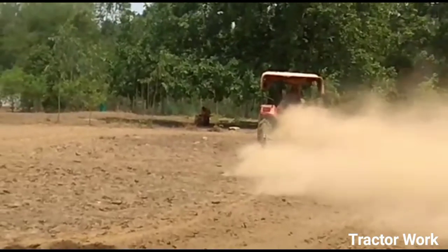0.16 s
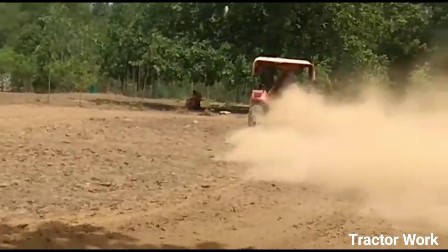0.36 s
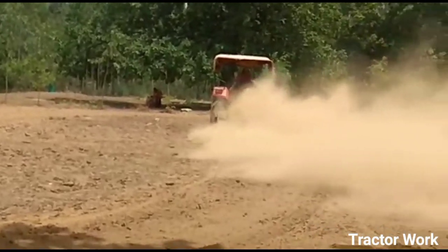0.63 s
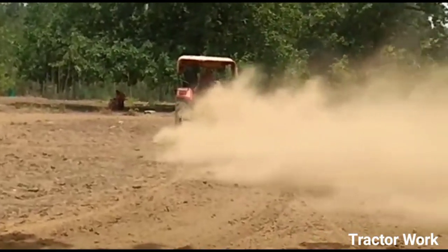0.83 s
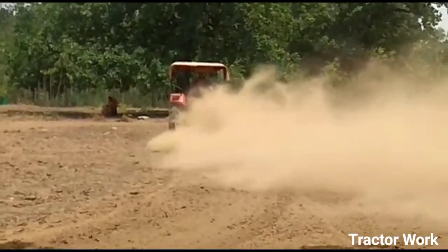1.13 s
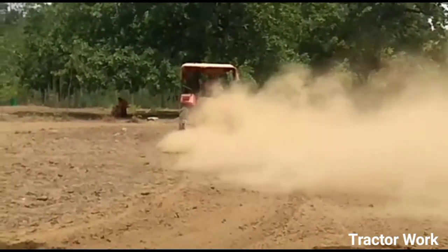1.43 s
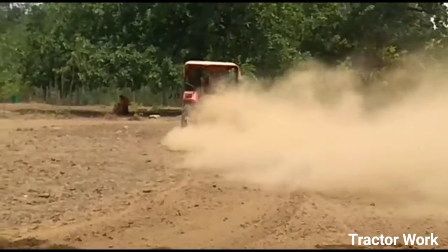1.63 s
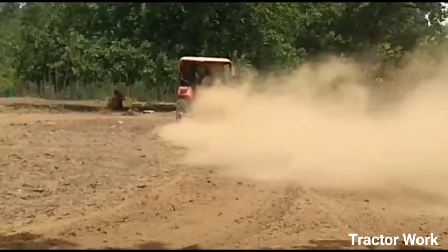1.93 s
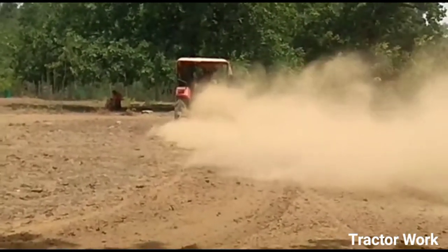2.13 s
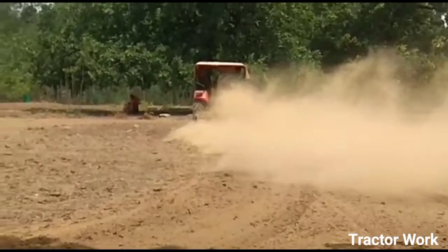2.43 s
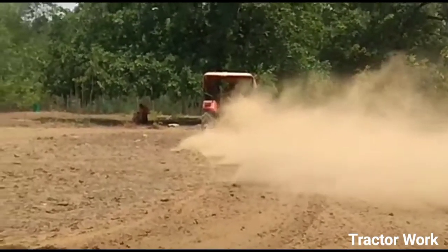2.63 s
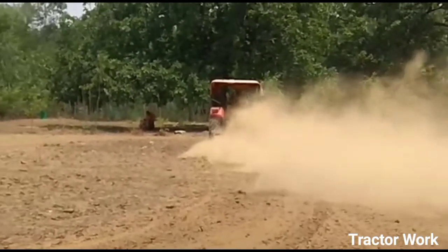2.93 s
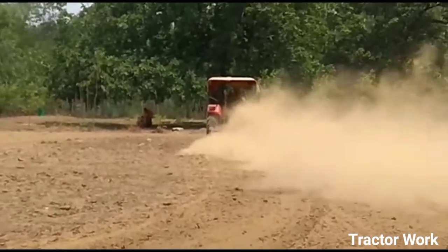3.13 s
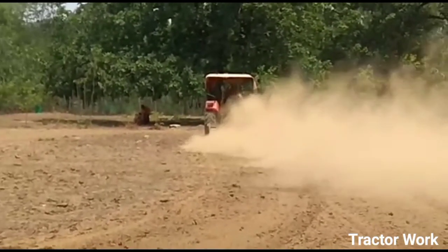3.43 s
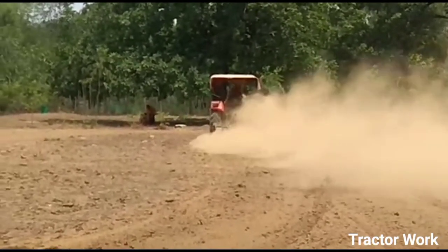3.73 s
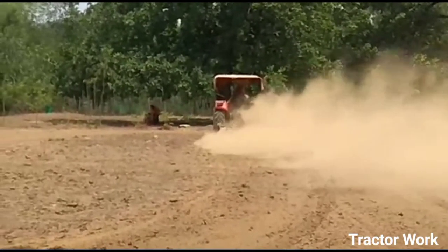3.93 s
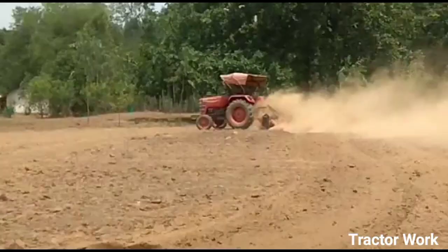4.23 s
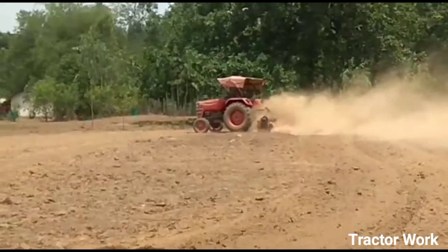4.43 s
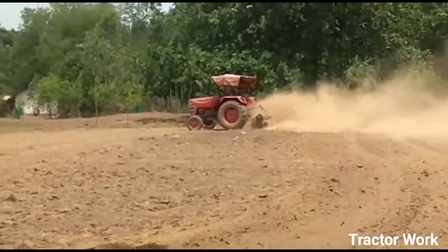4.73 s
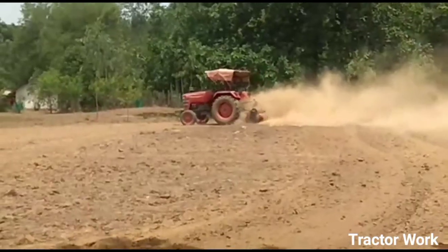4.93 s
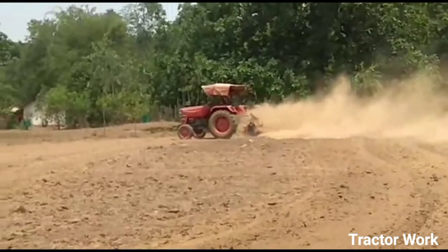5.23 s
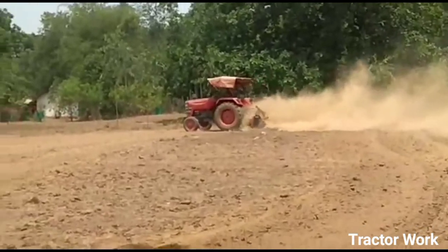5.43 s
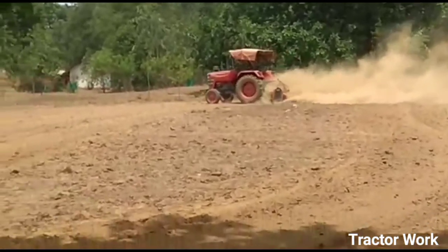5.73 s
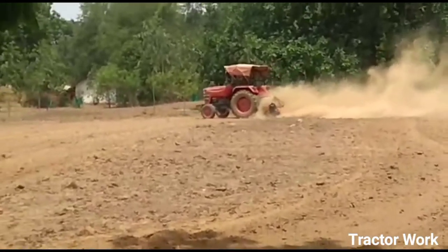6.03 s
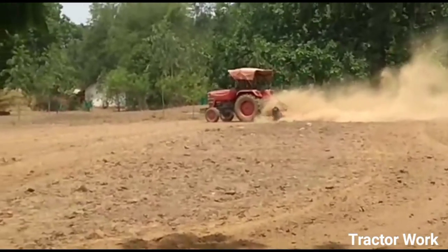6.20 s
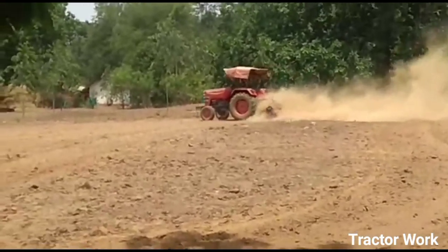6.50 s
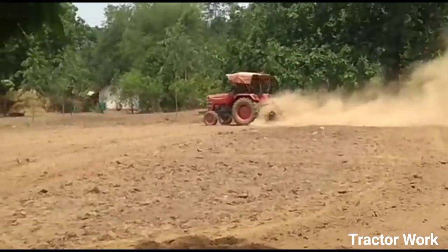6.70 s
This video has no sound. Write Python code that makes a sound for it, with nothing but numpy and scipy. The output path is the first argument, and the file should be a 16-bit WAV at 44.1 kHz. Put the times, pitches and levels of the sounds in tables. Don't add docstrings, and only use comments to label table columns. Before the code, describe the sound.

Throbbing tractor engine and gritty tiller blades work a dry field, loud and gusty at first, then abruptly thinner and fading after a cut.

```python
import sys
import numpy as np
from scipy import signal
from scipy.fft import rfft, irfft
from scipy.io import wavfile
from scipy.ndimage import uniform_filter1d

SR = 44100
rng = np.random.default_rng(int(sys.argv[2]) if len(sys.argv) > 2 else 0)


def boost(x):
    u = np.asarray(x, float) / 20
    return 10 ** u


def store_pcm(level_fs):
    pcm = np.round(np.clip(level_fs, -1, 1) * 32767).astype(np.int16)
    wavfile.write(sys.argv[1], SR, np.atleast_2d(pcm).T)


N = 302526
CUT_S = 4.16


def rms_one(x):
    return x / np.sqrt(np.mean(x ** 2) + 1e-20)


def in_time(rows):
    s, *columns = np.transpose(rows)
    return [np.interp(np.arange(N) / SR, s, column) for column in columns]


def panned(left_minus_right_db):
    left = boost(left_minus_right_db)
    return 2 * np.array([left, np.ones_like(left)]) / (1 + left)


def either_view(behind, side):
    return np.where(np.arange(N) < CUT_S * SR, behind, side)


def drift(rate_hz):
    r = np.exp(-80 * np.pi * rate_hz / SR)
    slow = signal.lfilter([1], [1, -2 * r, r * r], rng.standard_normal(N // 40 + 2002))[2000:]
    return np.interp(np.arange(N) / 40, np.arange(len(slow)), rms_one(slow))


def coloured(spectrum, channels, gate=1):
    hz, db = np.transpose(spectrum)
    shape = boost(np.interp(np.log(np.fft.rfftfreq(N, 1 / SR) + 1), np.log(hz), db))
    noise = gate * rng.standard_normal((channels, N))
    return rms_one(irfft(rfft(noise) * shape, N))


def pair(alike):
    shared, own_left, own_right = rng.standard_normal((3, N))
    return np.sqrt(alike) * shared + np.sqrt(1 - alike) * np.array([own_left, own_right])


def resonant(x, modes, patchy_db):
    out = 0
    for k, (hz, width_hz, db, pan_db) in enumerate(modes):
        r = np.exp(-np.pi * 1.55 * width_hz / SR)
        section = [(1 - r * r) / 2, 0, (r * r - 1) / 2, 1, -2 * r * np.cos(2 * np.pi * hz / SR), r * r]
        gain = panned(pan_db)[:, None] * boost(db + patchy_db * drift(8.0)[:x.shape[1]])
        out = out + (-1) ** k * gain * signal.sosfilt([section, section], x)
    return out


def body(drive, views, patchy_db):
    cut = round(CUT_S * SR)
    heard = []
    for part, modes in zip((drive[:, :cut], drive[:, cut:]), views):
        ringing = resonant(part, modes, patchy_db)
        heard.append(ringing / np.std(ringing.mean(axis=0)))
    return np.hstack(heard)


def firing_gate(turns, depth, sharpness, uneven_db):
    count = turns.astype(int)
    cylinder_db = np.array([0., -1.5, -3.])[count % 3]
    strength = boost(cylinder_db + uneven_db * rng.standard_normal(count.max() + 1)[count])
    return 1 - depth + depth * strength * np.exp(-sharpness * (turns % 1))


def struck(noise, gate, turns, knock_db):
    return gate * (noise + boost(knock_db) * np.diff(np.floor(turns), prepend=0))


def grit(per_s, size_db):
    sizes = boost(size_db * np.minimum(rng.exponential(1, N), 4))
    hits = (rng.random(N) < per_s / SR) * sizes
    r = np.exp(-1 / (0.0027 * SR))
    return 1 + .5 * signal.lfilter([1], [1, -r], hits)


# t/s, half length/s, surge level/dB, colour (-1 shakes pipe and frame, 1 sprays soil)
BITES = [(.12, 0.42, 4.7, 0.062), (.46, 0.13, 4.1, -0.74), (0.571, 0.11, 8.8, 0.76),
         (1.04, 0.29, 3.2, -0.2), (1.25, 0.24, 3.9, -0.59), (1.458, 0.15, 2.8, -0.43),
         (1.7, 0.21, 5.1, -0.064), (1.92, 0.17, 5.7, -0.21), (2.1, 0.18, 3.5, -0.076),
         (2.3, .08, 4.2, -0.87), (2.618, 0.18, 7.4, -0.16), (2.763, 0.15, 4.4, 0.78),
         (3.12, 0.14, 7, -0.75), (3.202, 0.16, 8.5, 0.31), (3.54, 0.086, 3, 0.3), (3.66, .15, 7.5, -0.031),
         (3.85, 0.12, 2.2, 0.21), (4.169, 0.041, 4.2, 0.17), (4.324, 0.2, 13.2, -0.047),
         (4.849, 0.29, 8.2, 0.15), (5.004, 0.16, 4.9, -0.83), (5.47, 0.18, 6.8, -0.13),
         (5.62, 0.15, 4.2, 0.84), (5.76, 0.14, 5, 1), (6.0, 0.22, 5.7, -0.25), (6.3, 0.28, 4.2, -0.077),
         (5.36, 0.052, 3.1, 0.39), (6.62, .3, -2.5, 1), (.72, .1, 3.5, -0.63), (4.05, 0.075, 6, -0.66),
         (3.35, .08, 3.8, -1.3), (5.85, 0.18, 2.5, 0.88)]
PARTS = {"pipe": (-46, -3.0, -60, -7, 0.94, -0.82), "frame": (-59, -1.41, -59, -2.5, 1.07, -0.5),
         "blades": (-54.5, -0.46, -57, 0.15, 0.7762, 0.44), "soil": (-53, -2.3, -60.5, -3.5, 0.88, 0.94)}


def part_db(name):
    rear_db, rear_fade, side_db, side_fade, share, lean = PARTS[name]
    t = np.arange(0, N + 64, 64) / SR
    s, half, surge_db, colour = np.transpose(BITES)[:, :, None]
    swell = np.maximum(1 - abs(t - s) / half, 0)
    surge = (surge_db * (1 + lean * colour) * swell).sum(axis=0)
    now = np.arange(N) / SR
    steady_db = either_view(rear_db + rear_fade * now, side_db + side_fade * (now - CUT_S))
    return steady_db + share * np.interp(now, t, surge)


# f/firing rate, rear level/dB, side level/dB
HARMONICS = [(0.752, -25.5, -28.5), (1.998, -11, -17), (4, -7.5, -7), (3, 1.5, -2.5), (5, -1, 8),
             (6.001, -6.5, -2), (7, -23.5, -6), (3.667, -21, -12.5), (1.667, -27.5, -23.5)]
# f/Hz, level/dB per Hz
RUMBLE = [
    [(20, -40), (40, -28), (65, -14), (100, -1), (160, 10), (210, 2), (280, -12), (400, -24), (700, -39.5)],
    [(20, -36), (40, -33), (65, -11), (100, -11.5), (165, 4.5), (200, -8.5), (250, -20.5), (400, -24),
     (700, -37.5)],
]
# t/s, level/dB, relative level/dB of harmonics above the fourth (fade with distance)
DRONE = [
    [(0, -36, 1), (.75, -36.5, 0), (1.25, -38, -3.5), (1.75, -36.5, -3), (2.25, -38, -8.5), (2.75, -39, -7),
     (3.2, -38.5, -5.5), (3.6, -41, -12), (4.15, -39.5, -18)],
    [(4.17, -44, -25), (4.4, -37.5, -25.5), (4.75, -42, -26), (5.25, -39, -29), (5.75, -39, -32),
     (6.24, -38, -27.5), (6.31, -42, -23), (6.39, -39, -25), (6.86, -38.5, -27.5)],
]


def drone(turns):
    drone_db, upper_db = in_time(sum(DRONE, []))
    turns = turns + .015 * drift(4.8)
    tones = 0
    for k, behind_db, side_db in HARMONICS:
        flicker_db = either_view(2.43, .7 + 2.2 * (k % 2 != 1)) * drift(7.2)
        level_db = either_view(behind_db, side_db) + (k > 4.5) * upper_db + flicker_db
        tones = tones + boost(level_db) * np.cos(2 * np.pi * k * turns + 0.34 * (k - 3) ** 2)
    throb = firing_gate(turns, 0.83, 4.1, 0.91)
    mid, side = either_view(*[coloured(view, channels=2, gate=throb) for view in RUMBLE])
    rumble = boost(either_view(-3, -10)) * (mid + 0.48 * side * [[1], [-1]])
    tones = panned(either_view(-5.5, -6.0)) * 1.06 * tones
    rumble = panned(either_view(-1.5, -4.5)) * rumble
    return boost(drone_db) * (tones + rumble)


# f/Hz, width/Hz, level/dB, left minus right/dB
PIPE = [
    [(809, 64.4, 0, -8.5)],
    [(850, 76, 20, -15.5), (920, 86, -13, 7)],
]


def pipe(turns):
    gate = firing_gate(turns, .55, 4, 2.5)
    return boost(part_db("pipe")) * body(struck(pair(.98), gate, turns, knock_db=24), PIPE, patchy_db=2)


# f/Hz, width/Hz, level/dB, left minus right/dB
FRAME = [
    [(956, 54, 3, -6), (1015, 58, -2, -7), (1207, 42, -3.5, -6), (1300, 61, -1.5, -12), (1400, 56, -5, -11),
     (1510, 63, 0.5, -6), (1645, 99, -4, -8), (2114, 145, -7, 2.5), (2571, 40, -8, 3)],
    [(1341, 40, -9.5, -9), (1470, 50, -8, -8), (1612, 74, -1, -21), (2253, 240, -14.5, -4),
     (2322, 55, 1.5, -14), (2796, 67, -6.5, -5.5)],
]


def frame(turns, grains):
    gate = firing_gate(turns, .5, 2.5, 4) * grains ** .7
    shaken = body(struck(pair(.45), gate, turns, knock_db=10), FRAME, patchy_db=4.2)
    return boost(part_db("frame") + 2.5) * shaken


# f/Hz, width/Hz, level/dB, left minus right/dB
BLADES = [
    [(3100, 214, -10, -5), (3764, 77, -1, -16), (3858, 447, -6.5, -4), (4940, 120, -45, -25),
     (7585, 153, -15.5, -12)],
    [(3250, 220, -12.5, -4.5), (3730, 51, -7, -2), (3954, 500, -4, -7.5), (4101, 312, 0.5, 2.5),
     (4810, 200, -11, -1.5), (5200, 350, -19, -4), (5573, 140, -10, -10), (6550, 600, -17, -4),
     (7550, 300, -5, -14)],
]


def blades(turns, grains):
    drive = pair(.8) * firing_gate(turns, .45, 3, 2.5) * grains
    return boost(part_db("blades") + 3.5) * body(drive, BLADES, patchy_db=2.3)


# f/Hz, width/Hz, level/dB, left minus right/dB
SOIL = [
    [(6270, 1700, -6, 3), (7690, 670, 0, -7.5), (9220, 1350, -1.5, 8), (11460, 1100, -3, 7.5),
     (13430, 1550, 0, -0.5)],
    [(6290, 1200, 1.5, 2), (8400, 330, 1.5, -10.5), (9400, 1400, -1.5, 27), (11320, 600, -3.5, 6),
     (12600, 1500, -6.5, -1), (14200, 370, -16, 11)],
]


def soil(turns, grains):
    drive = pair(0.15) * firing_gate(turns, 0.52, 7.0, 3.7) * grains ** 0.36
    return boost(part_db("soil")) * body(drive, SOIL, patchy_db=3.0)


# f/Hz, width/Hz, level/dB, left minus right/dB
CRACK_BODY = [(1564, 290, -18, -1.5), (2137, 163, -15, -1), (2528, 130, -10.5, 6), (3096, 240, -2.5, 1),
              (3810, 153, 3, -2.5), (4260, 310, -8, 1), (4790, 430, -11.5, 1.5), (5700, 410, -21, 0),
              (1400, 78, -24, 0)]


def clatter():
    clods = rms_one(resonant(pair(.7) * grit(per_s=250., size_db=3.5), CRACK_BODY, patchy_db=3))
    blade_db = part_db("blades")
    return boost(blade_db + .8 * (blade_db + 42.5)) * clods


# t/s, firing rate/Hz
FIRING = [(0, 43.9), (.4, 44.1), (.7, 43.7), (1.7, 43.8), (2.1, 44.4), (3.4, 44.5), (4.0, 44.4),
          (4.17, 43.8), (4.6, 44.2), (6.86, 44.0)]


def machine():
    (firing_hz,) = in_time(FIRING)
    turns = np.cumsum(firing_hz) / SR
    grains = grit(per_s=90., size_db=2.5)
    engine = drone(turns) + pipe(turns) + frame(turns, grains)
    return engine + blades(turns, grains) + soil(turns, grains) + clatter()


def air():
    return boost(-65.5) * coloured([(20, -36), (1000, 20.0), (5000, 7.5), (16000, -52)], channels=2)


# t/s, peak level/dB, left minus right/dB, time to die by 20 dB/s
GUSTS = [(.06, -47, -6, 0.3), (.25, -45.5, 14, 0.17), (.46, -44.5, 13, 0.14), (.63, -49, -22, 0.13),
         (0.842, -38, 12, .06), (.74, -45, -7, 0.04), (1.2, -39.5, 4, 0.2), (1.49, -55, 12, 0),
         (1.59, -45, 24, 0.14), (1.68, -34.5, 32, 0.16), (1.725, -39, -8, 0.02), (1.8, -42, -9, 0.13),
         (1.95, -39, 12, 0.07), (2.21, -37, 26, 0.1), (2.25, -49, 12, 0.08), (2.29, -35, -1, 0.0052),
         (2.54, -51, 10, 0.2), (2.59, -46, -5, 0.12), (2.86, -49, 2, 0), (3.19, -42.5, 4, 0.06),
         (3.34, -64, 4, 0.3), (3.519, -44, 11, 0.05), (3.67, -63, -2, 0.46)]
# f/Hz, level/dB per Hz
BUFFET = [(25, -47), (55, -25.5), (120, -4.5), (220, -0.5), (330, -15), (500, -31), (650, -35),
          (800, -23.5), (1500, -68)]
GUST_RISE_SHARE, BREEZE_DB, BREEZE_PAN_DB = 0.67, -67.5, -5.5


def wind():
    t = np.arange(0, N + 64, 64) / SR
    level = boost(BREEZE_DB) * panned(BREEZE_PAN_DB)[:, None]
    for s, db, pan_db, die_s in GUSTS:
        away = np.maximum(t - s, (s - t) / GUST_RISE_SHARE) / die_s
        level = level + panned(pan_db)[:, None] * boost(db - 20 * away)
    level = np.array([np.interp(np.arange(N) / SR, t, port) for port in level])
    lumps = boost(2.2 * np.array([drift(25), drift(25)]))
    return boost(7.0) * level * lumps * coloured(BUFFET, channels=2)


def rung(rows, share_db=0, pan_db=-8):
    out, t = np.zeros((2, N + SR)), np.arange(SR // 5) / SR
    rise_s = 0.0011
    for s, db, hz, t60 in rows:
        at = round(s * SR)
        envelope = boost(db + share_db - 60 * t / max(t60, .01)) * np.minimum(t / rise_s, 1)
        out[:, at:at + len(t)] += panned(pan_db)[:, None] * envelope * np.sin(2 * np.pi * hz * t)
    return out[:, :N] * boost(2 * drift(120))


# t/s, peak level/dB, f/Hz, t60/s
BARKS = [(0.031, -37, 793, 0.07), (0.099, -35, 815, 0.077), (0.196, -34, 824, 0.07), (0.28, -32, 854, 0.09),
         (0.349, -35, 800, 0.077), (0.439, -34, 780, 0.061), (0.485, -39, 790, 0.076),
         (0.69, -38, 775, 0.064), (0.789, -31, 790, 0.07), (0.88, -31.5, 830, 0.12),
         (1.037, -37.5, 786, 0.077), (1.128, -35, 814, 0.07), (1.37, -32, 781, 0.07),
         (1.398, -46, 802, 0.053), (1.512, -37, 789, 0.07), (1.649, -33, 810, 0.081),
         (1.739, -35, 824, 0.063), (1.876, -39, 832, 0.07), (1.944, -33, 750, 0.07),
         (2.107, -43, 790, 0.07), (2.868, -37, 805, 0.07), (3.122, -37, 848, 0.06), (3.276, -31, 816, 0.09),
         (3.544, -35, 837, 0.087), (3.612, -35, 780, 0.07), (3.769, -46, 970, 0.063),
         (3.815, -35, 794, 0.083), (4.017, -36, 834, 0.07)]


def barks():
    return rung(BARKS, share_db=-5)


# t/s, peak level/dB, f/Hz, t60/s
RATTLES = [(0.0593, -40.5, 1450, 0.08), (0.399, -38.5, 1510, 0.09), (0.491, -36, 1496, 0.098),
           (0.9926, -46, 1440, 0.09), (1.07, -44, 1510, 0.11), (1.2151, -42, 1380, 0.09),
           (1.5614, -46, 1350, 0.09), (1.7005, -40, 1270, 0.084), (1.8367, -51, 1470, 0.072),
           (1.907, -45, 1360, 0.09), (1.9729, -41, 1360, 0.09), (2.0396, -37.5, 1270, 0.09),
           (2.1288, -44, 1510, 0.07), (2.2897, -43, 1300, 0.1), (2.445, -40, 1380, 0.068),
           (2.5661, -44, 1270, 0.09), (2.651, -43, 1380, 0.09), (2.7686, -42, 1600, 0.096),
           (2.9682, -44, 1520, 0.09), (3.0634, -41, 1280, 0.09), (3.2819, -46, 1580, 0.09),
           (3.54, -46, 1380, 0.1)]


def rattles():
    return rung(RATTLES, share_db=-2.5)


# t/s, peak level/dB, f/Hz, t60/s
PINGS = [(0.1755, -40, 3920, 0.046), (0.3495, -37, 8420, .04), (0.4409, -40, 3850, .04),
         (0.691, -37, 820, .08), (0.8116, -34, 3790, .03), (0.9363, -35, 3730, .05),
         (1.4915, -31.5, 3780, 0.059), (1.6287, -39.5, 3960, .05), (1.8766, -42, 3870, .05),
         (2.0453, -38, 3820, .05), (2.1365, -38, 3940, 0.044), (2.3745, -37.5, 3870, .03),
         (2.6284, -40, 4010, .05), (2.8469, -35, 4020, .03), (3.1462, -39, 3840, .06),
         (3.1931, -38, 3780, .06), (3.5114, -30.5, 3140, .025), (3.5114, -28, 3920, .025),
         (3.5425, -17, 4170, 0.024), (3.5425, -33, 5770, 0.052), (3.5425, -29, 2170, 0.039),
         (3.546, -42, 1400, 0.056), (3.548, -20, 3828, 0.039), (3.556, -30, 2570, 0.069),
         (3.567, -33, 2570, 0.055), (.833, -37, 540, 0.048), (2.272, -35, 600, 0.083),
         (.605, -41, 403, 0.075), (3.611, -38, 856, 0.028), (4.0088, -31, 3890, .06),
         (4.158, -40, 1550, 0.048), (4.1804, -40, 3850, .03), (4.1804, -39, 2950, .04),
         (4.2378, -31.5, 3700, .1), (4.3011, -30.5, 4040, .06), (4.3854, -35, 3770, 0.045),
         (4.728, -39, 1550, 0.036), (4.762, -29.5, 4040, .06), (4.769, -33, 3800, 0.046),
         (4.9521, -35, 3990, .04), (4.957, -44, 2790, .08), (5.066, -43, 5660, 0.068),
         (5.1287, -39, 3800, 0.079), (5.1287, -46, 4850, .1), (6.0746, -38, 4050, 0.043),
         (6.2791, -38, 4050, .04)]


def pings():
    return rung(PINGS)


# t/s, peak level/dB, t60/s, treble share/dB
CRACKS = [(0.2473, -27, 0.18, -13.5), (0.3574, -38, 0.035, 7.5), (0.4409, -42, 0.058, -14),
          (0.4826, -27.5, 0.39, -9), (0.568, -33.5, 0.077, 4), (0.691, -44, 0.1, -5), (1.287, -44, 0.08, 4),
          (1.492, -30, 0.11, -10), (1.672, -34, 0.073, -12), (1.8766, -52, 0.11, -13),
          (1.9623, -28, 0.078, -6.5), (2.275, -44, 0.19, -17), (2.3753, -49, 0.024, -30),
          (2.972, -29.5, 0.13, -29), (3.034, -27, 0.26, -11.5), (3.0945, -23.5, 0.066, -13.5),
          (3.2755, -31, 0.17, 2), (3.4384, -32.5, 0.15, 1.5), (3.512, -34, 0.16, -20),
          (3.5417, -14, 0.091, -16), (3.74, -40, 0.34, 6.5), (4.0088, -32, 0.2, -15),
          (4.0179, -27, 0.17, -11), (4.2378, -35, 0.24, 0), (4.728, -31, 0.087, -15),
          (4.796, -31, 0.19, -14), (4.828, -32, 0.13, -14), (4.852, -31, 0.11, -18), (4.64, -32, 0.32, -18),
          (4.9521, -40, 0.06, -15), (5.062, -34, 0.08, -9), (5.758, -34.5, 0.11, -3)]
# left minus right/dB, and dB per dB of treble share
CRACK_PAN = [(-5, 0.16), (-5, 0.4)]


def cracks():
    low, high, click = np.zeros((3, 2, N))
    t = np.arange(SR // 3) / SR
    for s, db, t60, treble_db in CRACKS:
        at = round(s * SR)
        centre_db, lean = CRACK_PAN[int(s > CUT_S)]
        blow = boost(db - 60 * t / max(t60, .01))
        tail = boost(db - 15.5 - 14.5 * t / max(t60, .01))
        burst = panned(centre_db + lean * treble_db)[:, None] * (blow + tail)
        low[:, at:at + len(t)] += burst
        high[:, at:at + len(t)] += burst * boost(treble_db)
        click[:, at] = 4.0 * burst[:, 0]
    ragged = boost(0.57 * drift(140))
    thud = resonant(pair(.85) * low * ragged + click + 1e-18, CRACK_BODY, patchy_db=3.5)
    bright = signal.butter(2, [5500, 14500], "band", fs=SR, output="sos")
    spray = signal.sosfilt(bright, pair(0.85) * high * ragged)
    return boost(1.5) * thud + boost(-9.5) * spray


# t/s, peak level/dB, f/Hz, t60/s
SLAPS = [(0.466, -29, 221, 0.07), (0.688, -29, 221, 0.07), (0.832, -26, 207, 0.07), (1.21, -29, 256, 0.07),
         (1.374, -31, 221, 0.07), (1.589, -28, 258, 0.07), (1.645, -21, 199, 0.07), (1.676, -23, 234, 0.07),
         (1.716, -23, 210, 0.07), (1.762, -23, 213, 0.07), (2.152, -30, 199, 0.07), (2.188, -29, 172, 0.07),
         (2.529, -31, 205, 0.07), (2.642, -29, 172, 0.07)]


def slaps():
    return rung(SLAPS, share_db=-9, pan_db=4)


# t/s, peak level/dB, rise/s, t60/s, top f/Hz
CRASHES = [
    (3.5425, -31, .001, .13, 6300),
    (.49, -46, .01, .3, 4200),
    (.545, -47, .02, .25, 4800),
    (4.8, -45, .03, .3, 3500),
    (4.953, -43, .001, .07, 4500),
]


def crashes():
    out, t, noise = np.zeros((2, N)), np.arange(SR // 3) / SR, pair(.7)
    for s, db, rise, t60, top_hz in CRASHES:
        at = round(s * SR)
        band = signal.butter(4, [1600, top_hz], "band", fs=SR, output="sos")
        envelope = boost(db + 6 - 60 * t / t60) * np.minimum(t / rise, 1)
        out[:, at:at + len(t)] += signal.sosfilt(band, noise[:, at:at + len(t)]) * envelope
    return panned(-8)[:, None] * out


# t/s, level/dB, half length/s, tick share, lowest f/Hz
FIZZ = [
    (6.706, -58, .045, 4.0, 13200),
    (4.45, -60, .06, .3, 13200),
    (5.8, -54, .2, .1, 9400),
]


def fizz():
    out, noise = 0, pair(.5)
    for s, db, half, tick, low_hz in FIZZ:
        away = abs(np.arange(N) / SR - s)
        band = signal.butter(3, [low_hz, low_hz + 2400], "band", fs=SR, output="sos")
        envelope = np.exp(-(away / half) ** 2) + tick * np.exp(-away / .003)
        out = out + boost(db) * signal.sosfilt(band, noise) * envelope
    return out


# t/s, peak level/dB, left minus right/dB
KNOCKS = [
    (6.2585, -47, -6.5),
    (6.265, -39.5, -7),
    (6.279, -52, -6.5),
    (6.29, -50, -9),
    (6.307, -53, -6.5),
    (6.326, -52, -6.5),
    (6.336, -54, -8),
]
# f/Hz, level/dB, t60/s
KNOCK_MODES = [(1040, 13, 0.039), (920, 4, 0.05), (1355, -2, 0.036)]


def knocks():
    out = np.zeros((2, N))
    for s, db, pan_db in KNOCKS:
        t = np.maximum(np.arange(N) / SR - s, 0)
        ring = 0
        for hz, mode_db, t60 in KNOCK_MODES:
            ring = ring + boost(mode_db - 60 * t / t60) * np.sin(2 * np.pi * hz * t)
        soft_contact = np.minimum(t / 0.0041, 1) ** 2
        out += panned(pan_db)[:, None] * boost(db) * ring * soft_contact
    return out


def scene():
    blows = barks() + rattles() + pings() + cracks() + slaps() + crashes() + fizz() + knocks()
    return machine() + air() + wind() + blows


# f/Hz, level/dB under the neighbours
MASK_MARGIN = [(1700, 26), (2800, 17), (3600, 11), (4500, 8), (5300, 3), (6800, 3.5), (8500, 3.5),
               (10000, 5), (13000, 5)]
# f/Hz, level/dB per line
HEARING_LIMIT = [(2000, -106), (5000, -98), (8000, -96), (12000, -95), (14000, -90), (15500, -80)]


def mute_masked(x, spread_db, luck_db):
    frames = dict(nperseg=2048, noverlap=1024, window="cosine")
    z = signal.stft(x, **frames)[2]
    power = (abs(z[:, :-1]) ** 2).reshape(2, 128, 8, -1).mean(axis=2)
    hz = (np.arange(128)[:, None] + .5) * SR / 256
    skirt = boost(-2 * spread_db * abs(np.arange(-20, 21)))[None, :, None]
    both = uniform_filter1d(.3 * power + .7 * power.max(axis=0), size=3)
    around = signal.fftconvolve(both, skirt / skirt.sum(), mode="same", axes=1)
    masked = around * boost(-2 * np.interp(hz, *np.transpose(MASK_MARGIN)))
    audible = boost(2 * np.interp(hz, *np.transpose(HEARING_LIMIT)))
    limit = (masked + audible) * (hz > 1700)
    treble = power[:, 10:].sum(axis=(0, 1))
    loud_blow = (treble > 15 * np.median(treble)) & (hz < 7000)
    limit = limit * np.where(loud_blow, .1, 1)
    luck = boost(2 * luck_db * rms_one(uniform_filter1d(rng.standard_normal(power.shape), size=8)))
    lasting = uniform_filter1d(power, size=3)
    z[:, :-1] *= np.repeat(np.maximum(lasting, power / 2) * luck > limit, 8, axis=1)
    z[:, :-1] *= abs(z[:, :-1]) ** 2 > np.repeat(limit, 8, axis=1)
    return signal.istft(z, **frames)[1][:, :N]


def roll_off(x):
    return signal.sosfilt(signal.butter(12, 15590, fs=SR, output="sos"), x)


def record(dry):
    notch_hz, width_hz = 3546, 183
    ported = signal.lfilter(*signal.iirnotch(notch_hz, notch_hz / width_hz, fs=SR), dry)
    mix = mute_masked(ported, spread_db=1.5, luck_db=7)
    return roll_off(mix)


dry = scene()
out = record(dry)
store_pcm(out)
```